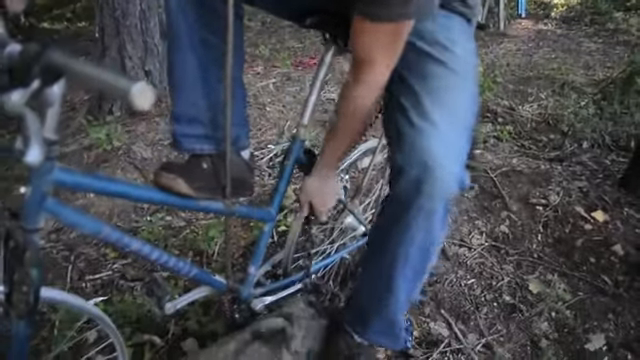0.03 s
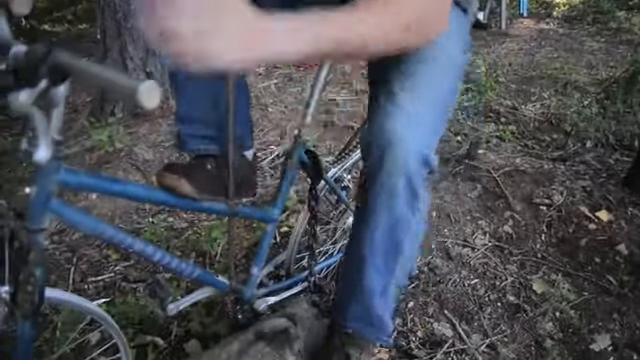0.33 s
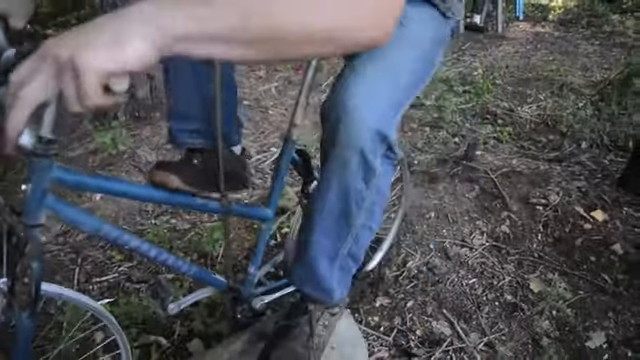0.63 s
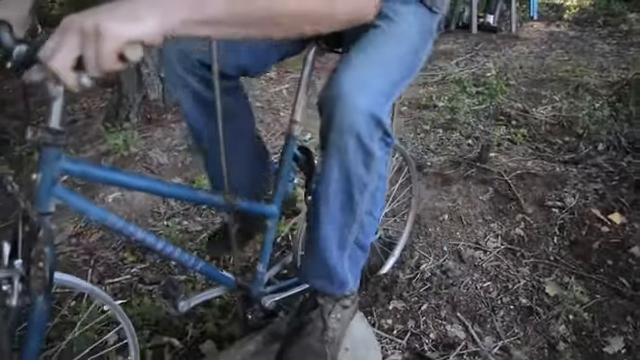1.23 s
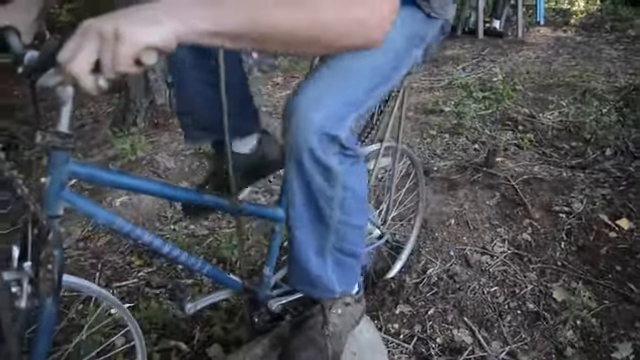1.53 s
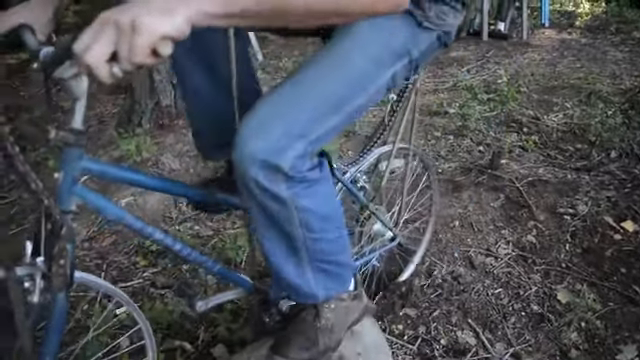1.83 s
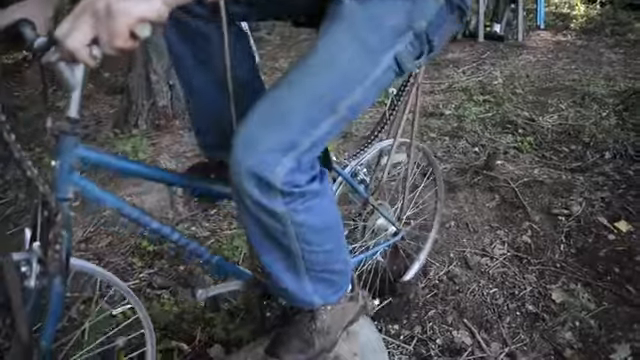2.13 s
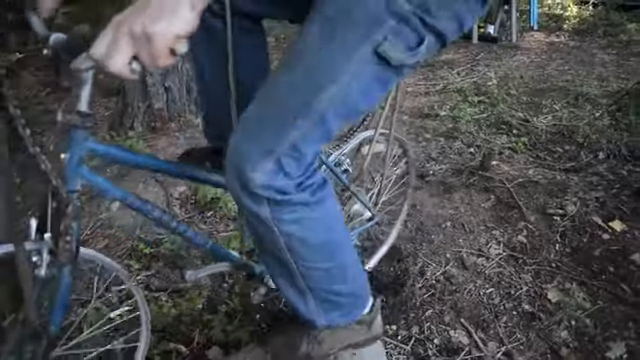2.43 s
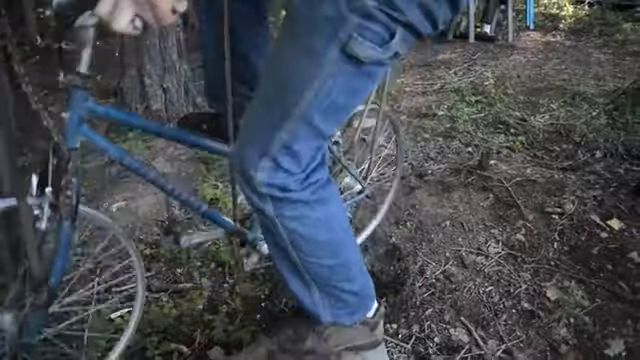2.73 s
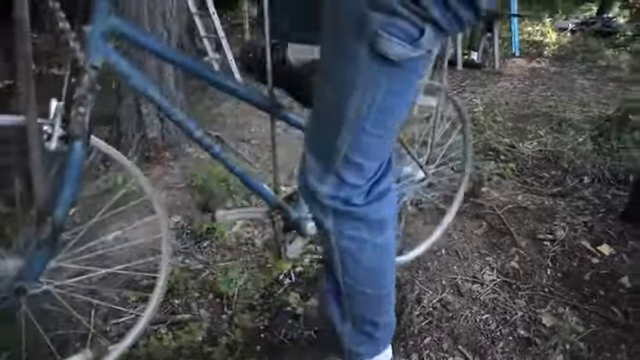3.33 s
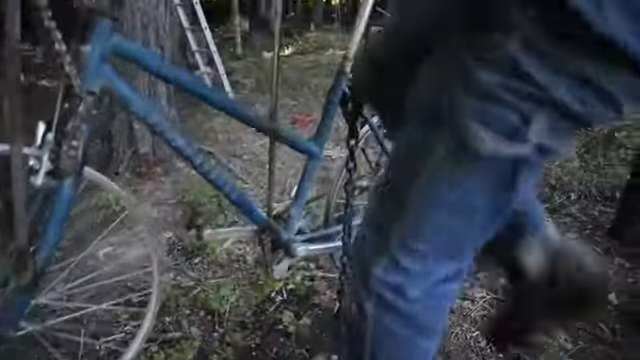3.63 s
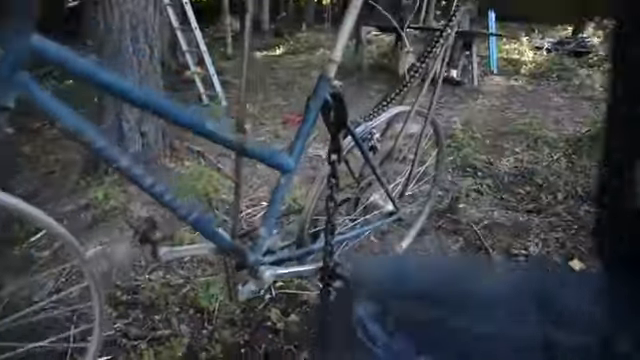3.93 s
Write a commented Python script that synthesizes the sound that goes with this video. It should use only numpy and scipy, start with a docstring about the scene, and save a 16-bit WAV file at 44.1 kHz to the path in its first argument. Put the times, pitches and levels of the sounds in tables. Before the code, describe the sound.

A slack bicycle chain jingles close by, clanking on the frame and flicking spokes through the first second, over faint boot scuffs. At 1.5 seconds the tyres thump softly and dry leaves crunch. More rattles and clanks come around 2 to 2.5 seconds. From 2.8 the tyres rumble low while the chain snaps sharply over the sprocket, slipping in a rasp near 3.2. Last clanks land around 3.8 seconds.

```python
"""A forest floor in quiet air, one microphone close to an old bicycle. Boots scuff the soil as the rider
lets go of the slack chain: it jingles, clanks on the steel frame and flicks the spokes. At 1.5 s the
rider mounts; the tyres thump under the weight and dry leaves crunch. The chain rattles on, and from
2.8 s, as the tyres rumble into a roll, it snaps over the sprocket teeth and slips in one long rasp.
A few last clanks follow. The loudest hits overload the microphone."""
import sys
import numpy as np
from scipy import signal
from scipy.fft import rfft, irfft, next_fast_len
from scipy.io import wavfile

SR = 44100
rng = np.random.default_rng(int(sys.argv[2]) if len(sys.argv) > 2 else 0)


def store_pcm(level_fs):
    """Save levels as 16-bit WAV."""
    pcm = np.round(np.clip(level_fs, -1, 1) * 32767).astype(np.int16)
    wavfile.write(sys.argv[1], SR, np.atleast_2d(pcm).T)


N = 176400
T = np.arange(N) / SR

# spectra of the air and the materials: frequency_hz, level_db
AIR_SPECTRUM = [(25, 2), (150, 0.5), (1800, -25.5), (4500, -4.5), (8500, -19.5)]
STEEL_SPECTRUM = [(100, -50), (280, -19.5), (700, -15.5), (1300, -6.5), (2000, -14.5), (2800, -6.5),
                  (4800, -0.5), (7000, -15.5), (9000, -25), (15000, -35.5)]
SOIL_SPECTRUM = [(100, -8), (300, 0), (5000, -2), (15000, -40)]
TYRE_SPECTRUM = [(25, -4), (150, -4), (1800, -21.5), (15000, -55)]
LEAF_SPECTRUM = [(1500, 2.5), (6500, 10.5), (15000, -21)]
# ringing modes of the frame, chainwheel and inflated tyres: pitch_hz, level_db
FRAME_MODES = [(2300, 4.5), (3171, -2), (3655, -17), (3990, 3), (4320, 1), (4682, -10), (4990, -34)]
CHAINWHEEL_MODES = [(1788, -6.5), (2172, 0.5), (2949, -4), (3245, -5.5), (3478, -3.5), (4232, -2.5),
                    (4410, -4), (4590, -7)]
BOOM_MODES = [(148, 15.5), (178, 17.5)]
# loudness of the chain's jingle, which dips briefly after two early clanks: time_s, level_db
JINGLE_CURVE = [(0, -17.5), (.06, -27.5), (.2, -32.5), (.25, -53), (.39, -29), (.45, -100), (.5, -27),
                (.81, -41), (.88, -26.5), (1.1, -50.5), (1.85, -39), (2.3, -33), (2.75, -41.5),
                (3.42, -29.5), (4, -34)]
# loudness of the shifting boots and rumbling tyres: time_s, level_db
SCUFF_CURVE = [(0, -30), (.23, -49), (.58, -39), (.92, -44.5), (1.1, -55), (1.6, -48.5), (3.42, -46)]
ROLL_CURVE = [(0, -65.5), (1.49, -60.5), (1.53, -27.5), (1.66, -44.5), (2.6, -56.5), (2.8, -37.5),
              (3.0, -35), (3.3, -46)]
# chain and crank hit the frame: start_s, level_db, crack_t60_s, body_db, treble_db, pitch_hz
FRAME_KNOCKS = [(0.2294, -18.5, 0.024, -9, -4, 4380), (0.281, -16.5, 0.028, -18, -21, 1385),
                (0.4213, -12, 0.026, 3, -12, 2220), (0.4973, -21, 0.035, -5, -18, 3880),
                (0.569, -17.5, 0.029, -0.5, 5, 4270), (0.7293, -19, 0.073, 0, 1.5, 4100),
                (0.7444, -17.5, 0.046, -1.5, 10, 4360), (0.935, -5, 0.033, -5.5, 5, 3090),
                (1.0521, -18.5, 0.012, -6, -2.5, 2430), (1.9, -19.5, 0.059, 1, -20, 2690),
                (2.2525, -22, 0.039, -4.5, -1, 2940), (2.3483, -6.5, 0.021, 0.5, 5.5, 2820),
                (2.367, -16, 0.046, -2.5, 6, 3940), (2.4489, -12.5, 0.051, 1, -8, 3880),
                (3.101, -24.5, 0.067, 5, 2, 1540), (3.76, -6, 0.037, -7.5, -3.5, 2800),
                (3.888, -15, 0.052, 6.5, -5.5, 2690), (3.9125, -11, 0.015, -2, 5.5, 710)]
# the chain flicks a spoke: start_s, level_db
SPOKE_FLICKS = [(0.266, -13), (0.302, -7.5), (0.464, -8), (0.828, -5.5)]
# a spoke is plucked: start_s, level_db, pitch_hz
SPOKE_PINGS = [(0.746, -30.5, 7120), (0.937, -37, 7570), (2.491, -22, 4460), (2.543, -27, 5380)]
# runs of links dragged over steel: start_s, level_db, hold_s, t60_s, mids_db
CHAIN_RATTLES = [(1.334, -25, 0.013, 0.03, -33), (1.375, -25, 0.021, 0.04, -44),
                 (1.977, -24, 0.0077, 0.17, 12), (2.479, -28, 0.089, 0.15, -5.5),
                 (3.09, -26.5, 0.061, 0.52, 3.5), (3.232, -11, 0.019, 0.41, -3.5)]
# dry leaves crushed: start_s, level_db, hold_s
LEAF_CRUNCHES = [(1.598, -33, 0.0027), (1.685, -33.5, 0.027), (3.399, -34, 0.026)]
# links snap onto sprocket teeth: start_s, level_db, ring_t60_s
SPROCKET_SNAPS = [(2.7973, -22, 0.0062), (2.848, -21.5, 0.064), (2.872, -12.5, 0.018), (2.931, -8, 0.048),
                  (3.014, -1.5, 0.025)]

BASS_HZ, MIDS_HZ, TREBLE_HZ = 424, 1320, 6000
METAL_T60_S = 0.11   # ring of the frame and chainwheel
EVENT_SAMPLES = SR // 2


def from_db(db):
    """Decibels to gain."""
    return 10 ** (np.asarray(db) / 20)


def unit_rms(x):
    """Scale to unit rms."""
    return x / np.sqrt(np.mean(x ** 2) + 1e-20)


def level(curve):
    """Gain along a curve of time_s, level_db."""
    return from_db(np.interp(T, *np.transpose(curve)))


def add(out, start_s, x):
    """Mix x in at start_s."""
    i = max(int(start_s * SR), 0)
    out[i:i + len(x)] += x[:N - i]


def envelope(t60_s, hold_s=0, attack_s=0.00084):
    """Half a second of attack, hold and exponential fade."""
    t = T[:EVENT_SAMPLES]
    return np.minimum(t / attack_s, 1) * from_db(-60 * np.maximum(t - attack_s - hold_s, 0) / t60_s)


def coloured(x, spectrum, bass_db=0, mids_db=0, treble_db=0):
    """Causal filter of unit power with the given spectrum, then two broad bells and a treble shelf."""
    size = next_fast_len(len(x) + 4096, real=True) // 2 * 2
    octave = np.log2(np.maximum(np.arange(size // 2 + 1) * SR / size, 1))
    hz, db = np.transpose(spectrum)
    shape = unit_rms(from_db(np.interp(octave, np.log2(hz), db)))
    bass = bass_db * np.exp(-((octave - np.log2(BASS_HZ)) / 1.14) ** 2)
    mids = mids_db * np.exp(-((octave - np.log2(MIDS_HZ)) / 1.006) ** 2)
    treble = treble_db / (1 + np.exp(-7 * (octave - np.log2(TREBLE_HZ))))
    cepstrum = irfft(np.log(shape * from_db(bass + mids + treble)))
    cepstrum[1:size // 2] *= 2   # minimum phase keeps attacks sharp
    cepstrum[size // 2 + 1:] = 0
    return irfft(rfft(x, size) * np.exp(rfft(cepstrum)))[:len(x)]


def clicks(size, per_s, spread_db):
    """Random contacts of uneven strength, at unit rms."""
    strength = from_db(spread_db * np.minimum(rng.exponential(1, size), 5))
    polarity = rng.choice([-1, 1], size)
    return unit_rms(strength * polarity * (rng.random(size) < per_s / SR))


def wobble(per_s, depth_db):
    """A gain that wanders at random."""
    steps = rng.standard_normal(1000)
    return from_db(depth_db * np.interp(T * per_s, np.arange(len(steps)), steps))


def crack(t60_s):
    """The dense, quickly dying chatter of one steel contact."""
    return rng.choice([-1, 1], EVENT_SAMPLES) * envelope(t60_s)


def tone(hz, t60_s):
    """One struck mode."""
    return np.sin(2 * np.pi * hz * T[:EVENT_SAMPLES]) * envelope(t60_s)


def modes(force, table, t60_s):
    """Damped resonators of alternating polarity ring in answer to a force."""
    out, radius = 0, from_db(-60 / (t60_s * SR))
    for k, (hz, db) in enumerate(table):
        feedback = [1, -2 * radius * np.cos(2 * np.pi * hz / SR), radius * radius]
        ring = signal.lfilter([1 - radius, 0, radius - 1], feedback, force + 1e-18)
        out = out + (-1) ** k * from_db(db) * ring
    return out


def spoke_ring(force, t60_s=0.17):
    """The wheel's steel answers a force with a thicket of close modes, at unit power gain."""
    response = crack(t60_s)
    return signal.fftconvolve(force, response / np.linalg.norm(response))[:N]


def thin(x, cutoff_hz=1400):
    """Small links have no bass."""
    return signal.sosfilt(signal.butter(4, cutoff_hz, "high", fs=SR, output="sos"), x)


def forest_air():
    """A faint, steady rumble and hiss lies under everything."""
    return from_db(-58) * coloured(rng.standard_normal(N), AIR_SPECTRUM)


def chain_jingle(spokes_db=-7, frame_db=1):
    """The hanging links tick one by one, ringing the frame and spokes."""
    gain = level(JINGLE_CURVE) * wobble(45, depth_db=2)
    ticks = coloured(clicks(N, per_s=900, spread_db=3.2), STEEL_SPECTRUM, treble_db=-10)
    links = thin(gain * ticks)
    frame = from_db(frame_db) * modes(links, FRAME_MODES, METAL_T60_S)
    return .5 * links + from_db(spokes_db) * spoke_ring(links) + frame


def boot_scuffs():
    """Grains of soil grind under the boots."""
    gain = level(SCUFF_CURVE) * wobble(40, depth_db=5)
    return gain * coloured(clicks(N, per_s=3000, spread_db=2.5), SOIL_SPECTRUM)


def frame_knocks(note_db=-5.5, ring_db=-4.5, spokes_db=-16, ring_db_per_s=200):
    """Chain and crank hit steel: a crack, the struck part's note, the ring of tubes, frame and spokes."""
    direct, force = np.zeros(N), np.zeros(N)
    for start_s, db, t60_s, body_db, treble_db, hz in FRAME_KNOCKS:
        hit = from_db(db) * coloured(crack(t60_s), STEEL_SPECTRUM, body_db, body_db, treble_db)
        note = coloured(crack(t60_s), [(hz / 2, -30), (hz, 0), (hz * 2, -30), (16000, -60)])
        add(direct, start_s, hit + from_db(db + note_db) * note)
        add(force, start_s, from_db(ring_db_per_s * t60_s) * hit)   # longer contacts ring harder
    tubes = modes(direct, [(285, 1)], t60_s=0.058)   # one low, hollow mode
    ring = modes(force, FRAME_MODES, METAL_T60_S) + from_db(spokes_db) * spoke_ring(force)
    return direct + tubes + from_db(ring_db) * ring


def spoke_flicks(trip_s=0.0034, t60_s=0.14, echo_db=-6, boost_db=11):
    """A pulse runs to and fro along a flicked spoke, smeared by its bends: a short metallic chatter."""
    out, trips_s = np.zeros(N), np.arange(1, 40) * trip_s
    for start_s, db in SPOKE_FLICKS:
        pulses = np.zeros(EVENT_SAMPLES)
        pulses[0] = 1
        returns = (trips_s * rng.uniform(.93, 1.07) * SR).astype(int)
        pulses[returns] = from_db(echo_db - 60 * trips_s / t60_s)
        add(out, start_s, from_db(db + boost_db) * spoke_ring(pulses, t60_s=0.024))
    # a thin spoke sounds mostly near the peak of the steel's spectrum
    return coloured(out, STEEL_SPECTRUM, bass_db=-8, mids_db=-8, treble_db=-8)


def spoke_pings():
    """A plucked spoke rings with one high note."""
    out = np.zeros(N)
    for start_s, db, hz in SPOKE_PINGS:
        add(out, start_s, from_db(db) * tone(hz, t60_s=0.18))
    return out


def chain_rattles(links_per_s=165, link_fade_db=20, spokes_db=-9, chainwheel_db=11):
    """Link after link bumps over an edge, each a brief scrape that rings the chainwheel and spokes."""
    runs = np.zeros(N)
    for start_s, db, hold_s, t60_s, mids_db in CHAIN_RATTLES:
        links_passed = np.cumsum(links_per_s * wobble(links_per_s, depth_db=2.3)[:EVENT_SAMPLES]) / SR
        link_fade = from_db(-link_fade_db * (links_passed % 1))
        scrapes = unit_rms(rng.standard_normal(EVENT_SAMPLES) * link_fade)
        run = scrapes * envelope(t60_s, hold_s, attack_s=.004)
        add(runs, start_s, from_db(db) * coloured(run, STEEL_SPECTRUM, mids_db=mids_db, treble_db=-2.5))
    links = thin(runs)
    chainwheel = from_db(chainwheel_db) * modes(links, CHAINWHEEL_MODES, METAL_T60_S)
    return .5 * links + from_db(spokes_db) * spoke_ring(links) + chainwheel


def tyres(mount_s=1.516, thump_db=-27.5, boom_db=-5):
    """The tyres thump as the rider's weight lands on the saddle, drum over uneven ground and boom."""
    rubber = level(ROLL_CURVE) * coloured(rng.standard_normal(N), TYRE_SPECTRUM)
    thump = rng.standard_normal(EVENT_SAMPLES) * envelope(t60_s=0.12, hold_s=0.025)
    add(rubber, mount_s, from_db(thump_db) * coloured(thump, TYRE_SPECTRUM, mids_db=6.5))
    return .5 * (rubber + from_db(boom_db) * modes(rubber, BOOM_MODES, t60_s=0.55))


def leaf_crunches():
    """Dry leaves are crushed in bursts of tiny, bright clicks."""
    out = np.zeros(N)
    for start_s, db, hold_s in LEAF_CRUNCHES:
        crunch = clicks(EVENT_SAMPLES, per_s=3000, spread_db=2.5) * envelope(t60_s=0.17, hold_s=hold_s)
        add(out, start_s, from_db(db) * coloured(crunch, LEAF_SPECTRUM))
    return out


def sprocket_snaps(pitch_hz=4233, crack_db=-7):
    """A taut link drops onto a tooth: a thin crack and one bright, damped note."""
    out = np.zeros(N)
    for start_s, db, ring_t60_s in SPROCKET_SNAPS:
        snap = coloured(crack(t60_s=0.035), STEEL_SPECTRUM, bass_db=-16.5, mids_db=-16.5, treble_db=2)
        add(out, start_s, from_db(db) * (tone(pitch_hz, ring_t60_s) + from_db(crack_db) * snap))
    return out


def scene():
    """The bicycle and the forest floor over quiet air, in mono."""
    air = forest_air()
    strikes = frame_knocks() + spoke_flicks() + spoke_pings()
    chain = chain_jingle() + chain_rattles() + sprocket_snaps()
    ground = boot_scuffs() + leaf_crunches() + tyres()
    return (air + strikes + chain + ground)[None]


def record(dry, overload=.7, stopband_hz=17000):
    """The loudest clanks softly overload the microphone; the highest treble is cut."""
    clipped = dry / (1 + (dry / overload) ** 6) ** (1 / 6)
    return signal.sosfilt(signal.cheby2(12, 70, stopband_hz, fs=SR, output="sos"), clipped)


dry = scene()
out = record(dry)
store_pcm(out)
```